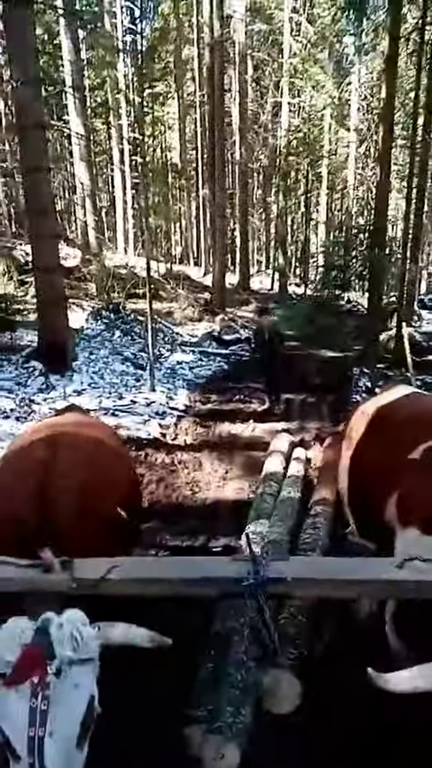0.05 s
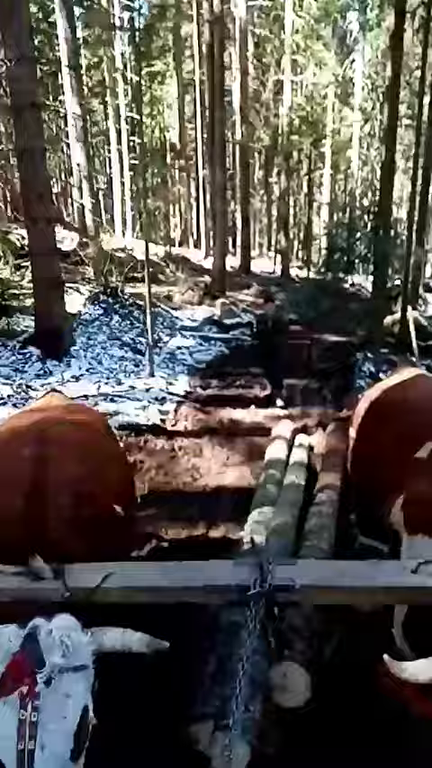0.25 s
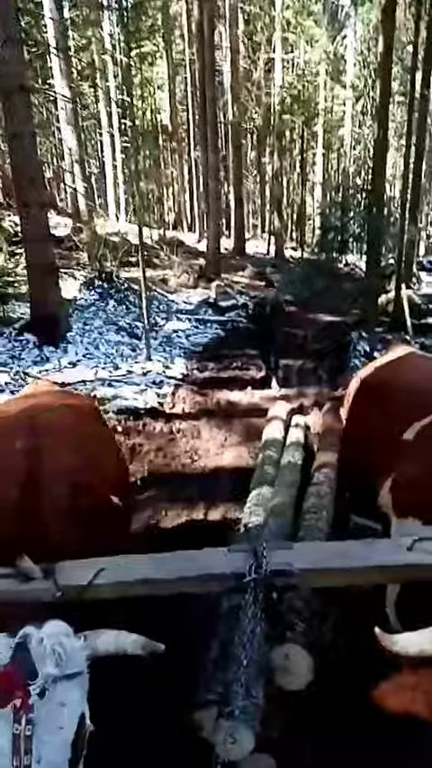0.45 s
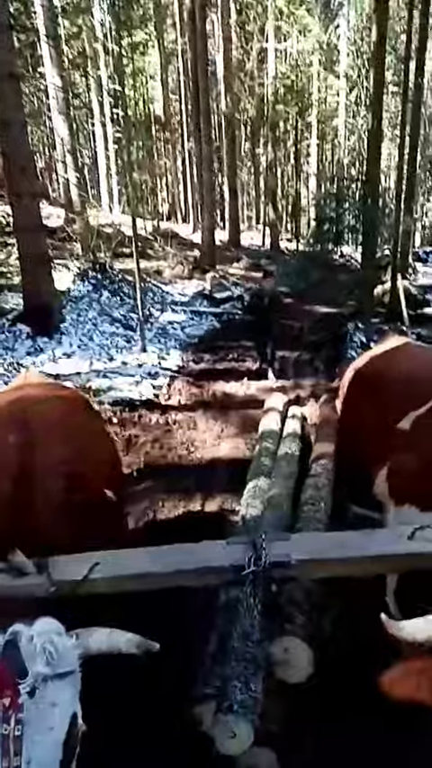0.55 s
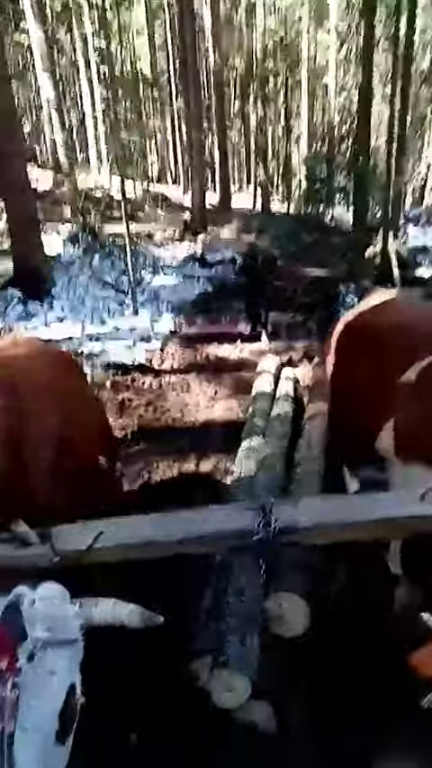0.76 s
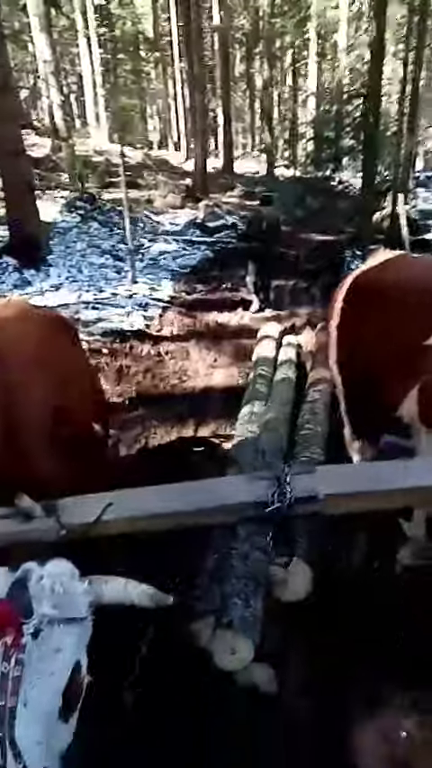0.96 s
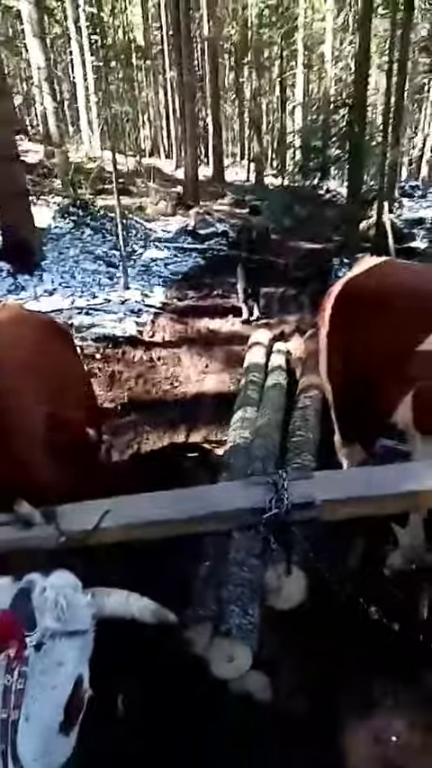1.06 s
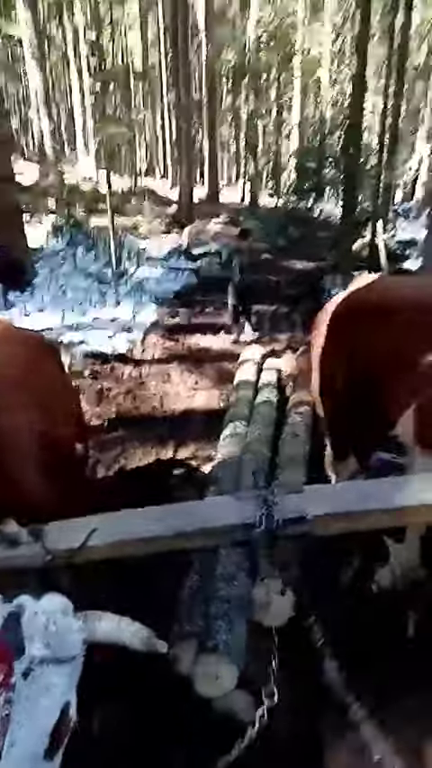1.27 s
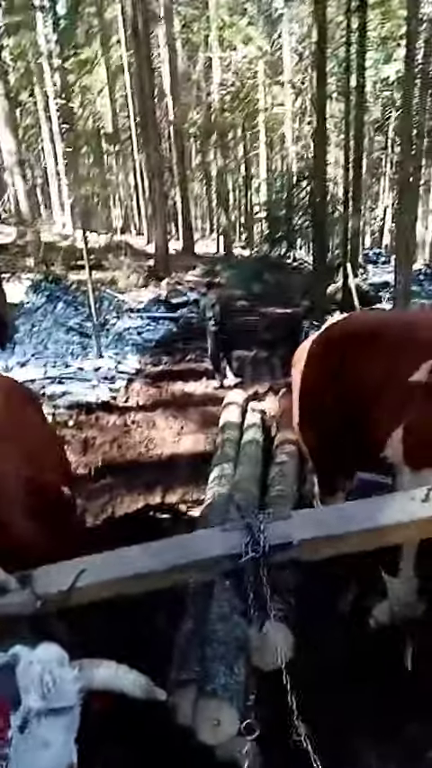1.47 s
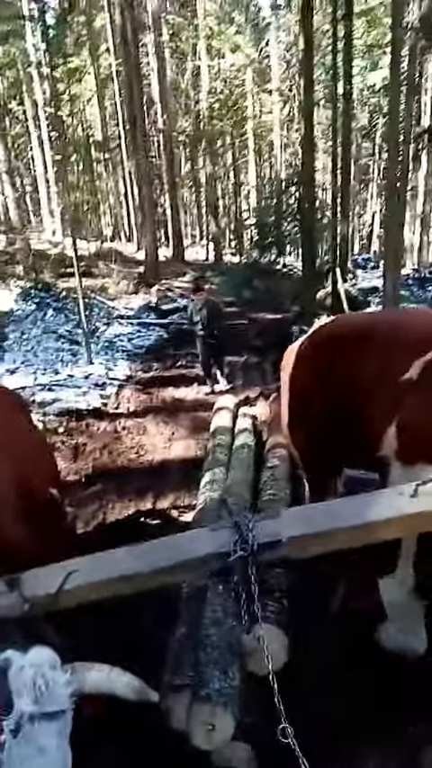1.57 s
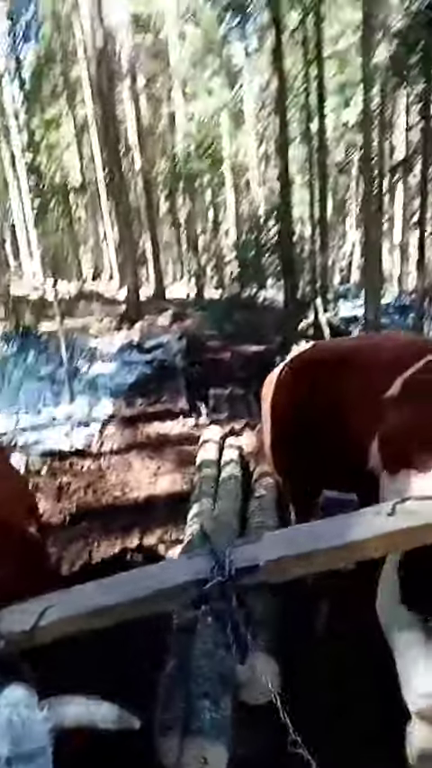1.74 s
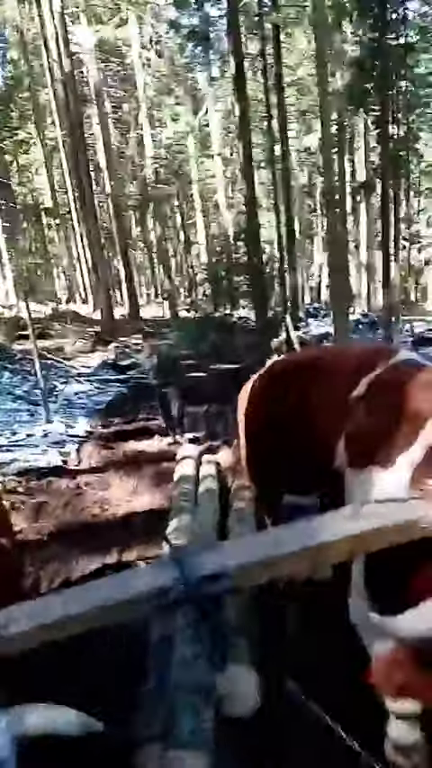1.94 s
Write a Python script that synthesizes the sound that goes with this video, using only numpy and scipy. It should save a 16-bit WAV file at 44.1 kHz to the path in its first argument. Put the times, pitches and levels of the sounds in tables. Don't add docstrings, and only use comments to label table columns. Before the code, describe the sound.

Close stereo pickup of high, shimmering ox bells struck at walking pace, already ringing at the start; chain links jingle, twigs snap, logs scrape softly over soil, with slight wind puffs and soft echo from trees.

```python
import sys
import numpy as np
from scipy import signal
from scipy.fft import rfft, irfft
from scipy.io import wavfile
from scipy.ndimage import uniform_filter1d

SR = 44100
rng = np.random.default_rng(int(sys.argv[2]) if len(sys.argv) > 2 else 0)


def put_to_file(sound):
    columns = np.atleast_2d(sound).T
    safe = np.clip(columns, -1, 1)
    whole_steps = np.round(safe * 32767)
    wavfile.write(sys.argv[1], SR, whole_steps.astype(np.int16))


def rack_gain(trim_db):
    fader = np.asarray(trim_db, float)
    return 10 ** (fader / 20)


N = 88420
TIME_S = np.arange(N) / SR

LEFT_LAG_S = -0.0008052


def evened(x):
    return x / np.sqrt(np.mean(x ** 2) + 1e-20)


def read(points, hz):
    f, value = np.transpose(points)
    return np.interp(np.log(hz + 1), np.log(f + 1), value)


def add(mix, start_s, sound, left_db):
    left = mix[0, round((start_s + LEFT_LAG_S) * SR):]
    right = mix[1, round(start_s * SR):]
    for side, gain in ((left, rack_gain(left_db)), (right, 1)):
        side[:len(sound)] += gain * sound[:len(side)]


def band(x, lo_hz, hi_hz):
    return signal.sosfilt(signal.butter(4, [lo_hz, hi_hz], "band", fs=SR, output="sos"), x)


def drift(rate_hz, count):
    steps = rng.standard_normal((count, 200))
    return np.array([np.interp(TIME_S * rate_hz, np.arange(200), row) for row in steps])


# time_s, right_db, left_db
STILL = [(0, 0, 0)]
RISE_S, LEFT_TWIN_TURNS = 0.0028, 0.31
TICK_DB, TICK_T60_S, SHIMMER_DB = -7, 0.015, 3


def bell(modes, blows, swing):
    out = np.zeros((2, N))
    struck = [np.clip((TIME_S - blow[0]) / RISE_S, 0, 1) for blow in blows]
    struck.append(np.zeros(N))
    shimmer = rack_gain(SHIMMER_DB * drift(rate_hz=14, count=2 * len(modes)))
    for k, (start_s, level_db, share_db, bright_db, lag_turns) in enumerate(blows):
        live = np.flatnonzero(struck[k] > struck[k + 1])
        gate = (struck[k] - struck[k + 1])[live]
        age_s = TIME_S[live] - start_s
        for m, (hz, apart_hz, twin_db, mode_db, t60_s, side_db) in enumerate(modes):
            octaves = np.log2(hz / modes[1][0])
            ring = gate * rack_gain(level_db + mode_db + bright_db * octaves - 60 * age_s / t60_s)
            twin_gain = rack_gain(twin_db + share_db)
            for ear, lag_s, turns, gain_db in ((0, LEFT_LAG_S, LEFT_TWIN_TURNS, side_db), (1, 0, 0, 0)):
                angle = 2 * np.pi * (age_s - lag_s)
                twin_phase = 2 * np.pi * (lag_turns + turns)
                pair = np.sin(hz * angle) + twin_gain * np.sin((hz + apart_hz) * angle + twin_phase)
                out[ear, live] += ring * pair * shimmer[2 * m + ear, live] * rack_gain(gain_db)
        tick_decay = rack_gain(level_db + TICK_DB - 60 * TIME_S[:400] / TICK_T60_S)
        tick = band(rng.standard_normal(400), 2000, 13000) * tick_decay
        if start_s > 0:
            add(out, start_s, tick, left_db=-22.5)
    s, right_db, left_db = np.transpose(swing)
    return out * rack_gain([np.interp(TIME_S, s, left_db), np.interp(TIME_S, s, right_db)])


HUM_HZ, THIRD_HZ, FIFTH_HZ, UPPER_HZ = 1740, 6308, 7057, 7320
# pitch_hz, twin_above_hz, twin_db, level_db, t60_s, left_db
NEAR_BELL = [(1849.5, 12, 0, -8, 3, -14.5), (4612, 6, -11.5, 2.5, 1.1, -11),
             (6725, 21.5, 3.5, -10.5, 0.69, 0), (6960, 17.5, -10.5, -3.5, 0.72, -14),
             (UPPER_HZ, 5.6, 0, -13.5, 0.49, -26.5), (10234.5, 12, -25.5, -8.5, 0.2734, 1),
             (11511, 60, 6, -33, .15, -23), (14173, 27, -13, -11, .14, -23),
             (15246, 30, -18, -5, 0.14, -31)]
# start_s, level_db, twin_db, brightness_db_per_octave, twin_lag_turns
NEAR_BLOWS = [
    (-.12, -25, 5, 10.5, -0.045),
    (.079, -27.5, -1, 4, -0.18),
    (0.811, -25.5, -1, -2.5, -0.55),
    (1.143, -25, -4, -4, -0.21),
    (1.540, -25, -8.5, -4.5, -0.25),
    (1.908, -27, -2, -1, -0.3),
]
# time_s, toward_right_db, toward_left_db
NEAR_SWING = [(0, -2, -9), (.22, -1, -4.5), (0.351, 1.5, -0.5), (0.699, 4.5, 2.5), (0.899, -3, -1.5),
              (1, 1, 11.5), (1.12, -4, 2), (1.4, -4.5, -4), (1.8, -6, -5), (2, -1, -1)]


def near_bell():
    return bell(NEAR_BELL, NEAR_BLOWS, NEAR_SWING)


# pitch_hz, twin_above_hz, twin_db, level_db, t60_s, left_db
MATE_BELL = [(HUM_HZ, 16, 0.6, -18, 3.2, -0.5), (4521, 10, -1, -0.5, 1.14, -6),
             (THIRD_HZ, 8, -20.5, -5, 0.84, -0.5), (6693.5, 16.5, 6, -2.5, 0.45, -0.5),
             (FIFTH_HZ, 7.6, 1, -10, 0.55, 3.5), (9798, 13.5, -10.5, -14, .5, 9),
             (13630, 40, -1, -14.5, .15, -21)]
# start_s, level_db, twin_db, brightness_db_per_octave, twin_lag_turns
MATE_BLOWS = [
    (-.3, -32, -10, -6, 0),
    (.523, -31.5, 4, 0.5, 0),
    (1.788, -34.5, 1, -4, 0.03),
]
# time_s, toward_right_db, toward_left_db
MATE_SWING = [(.3, -0.5, 1), (0.681, 0, -9.5), (.74, -2, 0), (.79, 5.5, 1), (1, -10, 0), (1.9, -1, -3.5)]


def mate_bell():
    return bell(MATE_BELL, MATE_BLOWS, MATE_SWING)


# pitch_hz, twin_above_hz, twin_db, level_db, t60_s, left_db
TRAIL_BELL = [(1984, 4, -5, 6, 2.2, -18), (3860, 8, -5, -2.5, 5.9, -7.5)]
# start_s, level_db, twin_db, brightness_db_per_octave, twin_lag_turns
TRAIL_BLOWS = [
    (-.1, -56.5, 0.0041, 0, 0),
    (1.13, -63.5, 0.0059, 0.0055, 0.0034),
    (1.5, -63.5, 0.022, 0, 0),
]


def trail_bell():
    return bell(TRAIL_BELL, TRAIL_BLOWS, STILL)


# pitch_hz, likeness (0 to 1)
SAME = [(250, 0.89), (4000, .6)]
# pitch_hz, left_db
TILT = [(60, -8.5), (380, 0.5), (2400, -5.5)]


def hiss(spectrum, size, patchy_db):
    frames, hz = 4 * N // size + 5, np.fft.rfftfreq(size, 1 / SR)
    a, b, c, d, patches = rng.standard_normal((frames, len(hz), 5)).T
    patches = uniform_filter1d(patches, size=14, axis=0)
    patches = evened(uniform_filter1d(patches, size=10, axis=1))
    same = np.clip(read(SAME, hz), -1, 1)[:, None]
    right = a + 1j * b
    left = same * right + np.sqrt(1 - same ** 2) * (c + 1j * d)
    left_path = rack_gain(read(TILT, hz)) * np.exp(-2j * np.pi * hz * LEFT_LAG_S)
    color = rack_gain(read(spectrum, hz)[:, None] + patchy_db * patches)
    z = np.array([left_path[:, None] * left, right]) * color
    x = signal.istft(z, nperseg=size, noverlap=3 * size // 4)[1][:, :N]
    return x / np.sqrt(np.mean(x[1] ** 2))


# time_s, level_db
DRAG = [(0, -68), (.45, -61.5), (.6, -68.5), (.85, -88), (1.002, -62), (1.202, -85.5), (1.45, -64),
        (2, -63.5)]
# pitch_hz, level_db
SOIL = [(30, -33), (250, -0.5), (700, -6), (3000, -40)]
# pitch_hz, level_db
FOREST = [(30, -18), (250, 1), (800, -10), (2000, 1), (6500, -6.5), (9500, -15.5), (11000, -44.5)]
FOREST_DB = -58


def logs_and_air():
    s, level_db = np.transpose(DRAG)
    drag_db = np.interp(TIME_S, s, level_db)
    scrape = rack_gain(drag_db + 2.5) * hiss(SOIL, size=1024, patchy_db=2.0)
    air_db = FOREST_DB + 0.18 * (drag_db - level_db.mean())
    return scrape + rack_gain(air_db) * hiss(FOREST, size=512, patchy_db=4.5)


# start_s, level_db
JINGLES = [(0.068, -40), (0.3596, -61.5), (0.4749, -49.5), (0.5247, -38), (0.618, -43.5), (0.9323, -65.5),
           (1.2057, -54), (1.3516, -53), (1.4583, -48.5), (1.535, -31.5), (1.6307, -63), (1.7454, -51),
           (1.7865, -47)]
# pitch_hz, level_db, t60_s
LINKS = [(5550, -6, 0.13), (7540, -11, 0.095), (13000, -17, .04), (14600, -4, .11), (15140, 13, 0.12),
         (15200, -10, .1)]
JINGLE_S = 0.035


def chain():
    out, t = np.zeros((2, N)), np.arange(4000) / SR
    rise = np.minimum(t / 0.0027, 1)
    for start_s, level_db in JINGLES:
        for n, (late, *bends) in enumerate(rng.random((4, 1 + len(LINKS)))):
            ring = np.zeros(len(t))
            for (hz, mode_db, t60_s), bend in zip(LINKS, bends):
                bent_hz = hz * (0.98 + 0.051 * bend)
                ring += bend * rack_gain(mode_db - 60 * t / t60_s) * rise * np.sin(2 * np.pi * bent_hz * t)
            ring *= 1 + 7.1 * band(rng.standard_normal(len(t)), 60, 470)
            add(out, start_s + JINGLE_S * late * n / 2, rack_gain(level_db - 1.5) * ring, left_db=-20.5)
    return out


# start_s, level_db, dull_part_db
SNAPS = [(0.1177, -41.5, -7.5), (0.2123, -48, 4.5), (0.2513, -50.5, 0.5), (0.2968, -50.5, 1),
         (0.3817, -50.5, 2.5), (0.4446, -49.5, 3.5), (0.6482, -40.5, -7.5), (0.7906, -43, -14),
         (0.9003, -57, -19), (1.3811, -40, -0.5), (1.5294, -47.5, -8.5), (1.625, -41, -16),
         (1.6403, -45.5, 2), (1.6619, -63, 4), (1.7455, -35, -3), (1.9051, -43, -4), (1.9555, -49, -25)]
SNAP_T60_S, RUSTLE_DB, RUSTLE_T60_S = 0.017, -1, 0.091


def twigs():
    out, t = np.zeros((2, N)), np.arange(5000) / SR
    decay = rack_gain(-60 * t / SNAP_T60_S) + rack_gain(RUSTLE_DB - 60 * t / RUSTLE_T60_S)
    for start_s, level_db, dull_db in SNAPS:
        crack = rng.standard_normal(len(t)) * decay
        bright = 3 * band(crack, 1820, 7320)
        dull = 4 * rack_gain(dull_db) * band(crack, 356, 1820)
        add(out, start_s, rack_gain(level_db - 4) * (bright + dull), left_db=-12)
    return out


# pitch_hz, level_db
YOKE = [(410, -76), (700, -35.5), (1180, -10.5), (1290, -10.5), (2230, 1), (2990, -23), (3600, -17),
        (4680, -33), (7920, -120)]
CLATTER_S, CLATTER_DB, CLATTER_HOLD_S, CLATTER_T60_S, KNOCKS_PER_S = 0.524, -27, 0.049, 0.2, 7000


def yoke():
    out, t = np.zeros((2, N)), np.arange(16000) / SR
    force = rack_gain(2.5 * rng.exponential(1, len(t))) * rng.standard_normal(len(t))
    knocks = force * (rng.random(len(t)) < KNOCKS_PER_S / SR)
    hz = np.fft.rfftfreq(len(t), 1 / SR)
    wood = evened(irfft(rfft(knocks) * rack_gain(read(YOKE, hz))))
    sag_db = 8.1 * np.minimum(t / CLATTER_HOLD_S, 1)
    decay_db = 60 * np.maximum(t - CLATTER_HOLD_S, 0) / CLATTER_T60_S
    shape = np.minimum(t / 0.01, 1) * rack_gain(-decay_db - sag_db)
    add(out, CLATTER_S, rack_gain(CLATTER_DB) * shape * wood, left_db=-9)
    return out


# start_s, level_db, top_hz, length_s
PUFFS = [
    (0.577, -73, 200, 0.031),
    (0.651, -70, 250, .05),
    (0.858, -49.5, 150, 0.051),
    (0.993, -54.5, 120, 0.051),
    (1.06, -53, 140, 0.029),
    (1.286, -55.5, 100, 0.034),
]


def wind():
    out, t = np.zeros((2, N)), np.arange(8000) / SR
    for start_s, level_db, top_hz, length_s in PUFFS:
        lump = evened(band(rng.standard_normal(len(t)), 54, top_hz))
        swell = (t / length_s) * np.exp(1 - (t / length_s) ** 2)
        add(out, start_s, rack_gain(level_db) * lump * swell, left_db=-17.5)
    return out


# pitch_hz, twin_above_hz, twin_db, level_db, t60_s, left_db
FAR_BELL = [(2143, 7.4, -32, 1, 2.9, -17.5), (4490, 30, -2.5, 6, 1.25, -26),
            (7840, 15, -1, -2.5, 0.33, -15)]
# start_s, level_db, twin_db, brightness_db_per_octave, twin_lag_turns
FAR_BLOWS = [
    (1.045, -55.5, -3, -7.5, -0.075),
    (1.25, -55.5, 2.5, -2.5, -0.59),
    (1.535, -43.5, -5, -1, -0.58),
    (1.88, -48.5, 0, -3.5, 0.02),
]


def far_bell():
    return bell(FAR_BELL, FAR_BLOWS, STILL)


# start_s, level_db, pitch_hz, t60_s
HOOF = [
    (1.753, -29, 174.4, 0.064),
    (1.768, -38.5, 950, 0.045),
    (1.76, -38, 114, 0.088),
]


def hoof():
    out, t = np.zeros((2, N)), np.arange(8000) / SR
    rise = np.minimum(t / 0.0016, 1)
    for start_s, level_db, hz, t60_s in HOOF:
        thud = rack_gain(level_db - 60 * t / t60_s) * rise * np.sin(2 * np.pi * hz * t)
        add(out, start_s, thud, left_db=0.5)
    return out


WOODS_DB, WOODS_T60_S = -11, 0.86


def woods(x):
    t = np.arange(SR // 2) / SR
    tail = band(rng.standard_normal((2, len(t))), 300, 8770) * rack_gain(-60 * t / WOODS_T60_S)
    tail *= t > 0.012
    return rack_gain(WOODS_DB) * signal.fftconvolve(x, tail / np.linalg.norm(tail[0]), axes=1)[:, :N]


def scene():
    team = near_bell() + mate_bell() + twigs() + chain() + yoke()
    ringing = team + far_bell() + trail_bell()
    return ringing + woods(ringing) + wind() + hoof() + logs_and_air()


def top_cut(x):
    return signal.sosfilt(signal.butter(12, 16600, fs=SR, output="sos"), x)


def record(dry):
    low_pass = signal.firwin(255, 15700, fs=SR)
    soft = signal.oaconvolve(dry, low_pass[None], "same")
    return top_cut(soft)


dry = scene()
out = record(dry)
put_to_file(out)
```